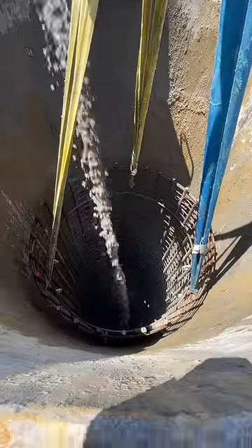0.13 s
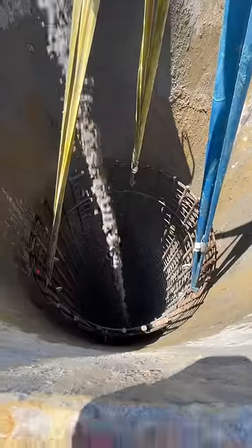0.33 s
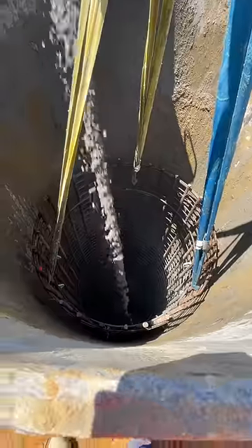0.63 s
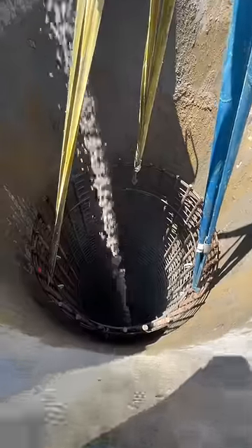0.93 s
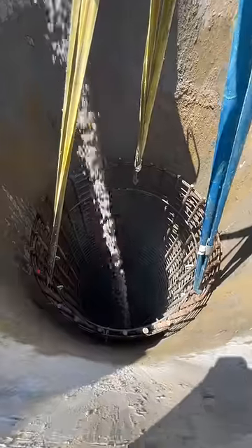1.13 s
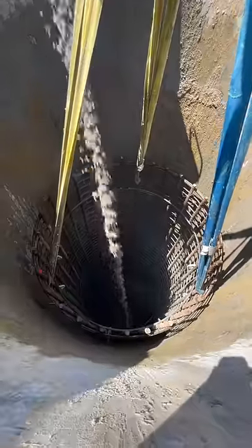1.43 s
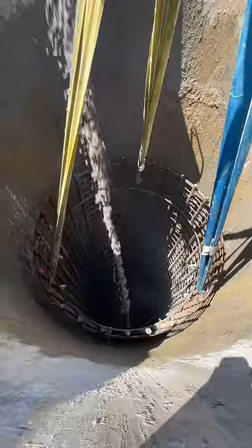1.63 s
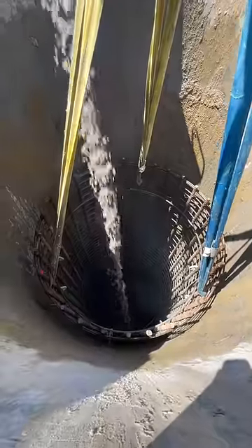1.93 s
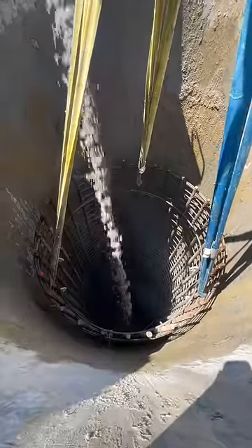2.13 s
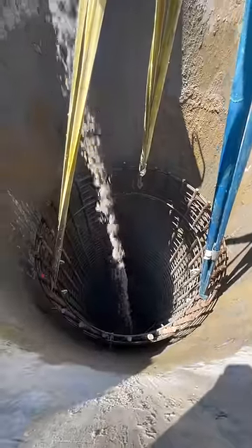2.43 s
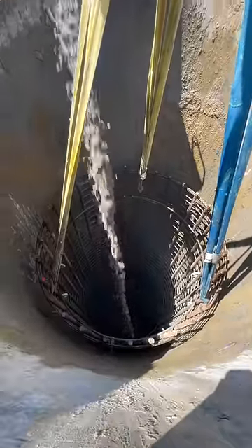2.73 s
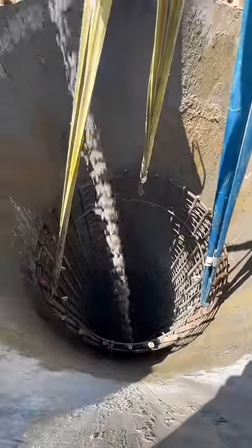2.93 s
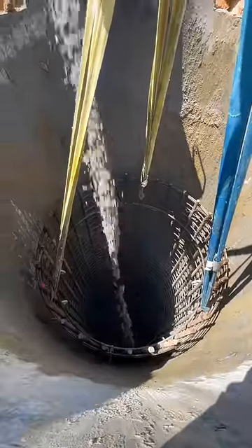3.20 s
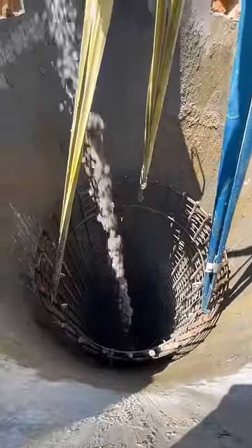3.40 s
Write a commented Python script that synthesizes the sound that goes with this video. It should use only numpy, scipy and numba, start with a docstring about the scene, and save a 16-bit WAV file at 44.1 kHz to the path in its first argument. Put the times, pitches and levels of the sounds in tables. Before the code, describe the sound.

Wet concrete pours into a deep shaft in a dense, surging, gravelly rush with wet splatter.

```python
"""Wet concrete falls from a chute into a deep drilled shaft with a steel cage, heard from the rim.
Throughout, grains and noise make a surging gravel rush, wet splatter, wash and a low, lumpy rumble.
Air pockets pop from the first instant as short sines; from 0.2 s slugs slap as bursts of banded grains;
from 0.6 s heavy clumps thud as wavering low sines. The clearest pop comes at 2.2 s, and the thuds
crowd together after 3 s."""
import sys
import numpy as np
from scipy import signal
from scipy.fft import rfft, irfft
from scipy.io import wavfile
from numba import njit

SR = 44100
rng = np.random.default_rng(int(sys.argv[2]) if len(sys.argv) > 2 else 0)


def int16_out(signal):
    """Quantize to a 16-bit WAV file."""
    q = np.round(np.clip(np.atleast_2d(signal).T, -1, 1) * 32767)
    wavfile.write(sys.argv[1], SR, q.astype(np.int16))


N = 156996
FREQS = np.maximum(np.arange(N // 2 + 1) * SR / N, 1)  # Hz


# surges of the pour, used about their mean: time_s [s], level_db [dB]
GRAVEL_SURGE = [(0, -27.5), (.07, -29), (.14, -29), (.21, -24.5), (.29, -25), (.37, -29.5), (.48, -29.5),
                (.55, -28), (.73, -29.5), (.79, -26.5), (.89, -27), (.99, -27.5), (1.17, -26), (1.205, -29),
                (1.24, -25.5), (1.37, -26), (1.46, -28), (1.6, -25.5), (1.64, -28.5), (1.71, -26),
                (1.85, -26), (1.98, -29), (2.04, -30.2), (2.1, -27.5), (2.19, -26.5), (2.26, -25),
                (2.37, -27), (2.41, -29), (2.47, -27), (2.6, -28), (2.69, -25.5), (2.77, -27), (2.85, -28),
                (3.08, -28.5), (3.15, -25.5), (3.35, -27.5), (3.47, -31), (3.52, -28), (3.55, -24)]
# gravel spectrum: freq_hz [Hz], gain_db [dB]
GRAVEL_SPECTRUM = [(1200, -23.5), (2500, -4.5), (3400, -3), (4100, -2.3), (4850, 1.5), (6500, -0.3),
                   (7500, -6.5), (9100, -4), (10500, -8.5), (12000, -11.5), (13200, -14)]
STONES_PER_S, STONE_SPREAD_DB, STONE_CYCLES = 9000, 1, 16  # rate at mean flow; cycles to -60 dB
SPRAY_DB, GRAVEL_DB = 1, -24.5  # spray is relative to the ticks


def gravel():
    """Stones tick in a fine spray; more of them, and louder, as the flow surges."""
    flow_db = swing(GRAVEL_SURGE)
    stones_per_s = STONES_PER_S * from_db(.5 * flow_db)
    ticks = grains(stones_per_s, STONE_SPREAD_DB, STONE_CYCLES, low_hz=1905, high_hz=14700)
    spray = from_db(SPRAY_DB) * noise()
    rush = coloured(ticks + spray, GRAVEL_SPECTRUM)
    flicker_db = 0.27 * drift(7.3)
    return rush * from_db(GRAVEL_DB + 0.86 * flow_db + flicker_db)


# wet splatter level, used about its mean: time_s [s], level_db [dB]
SPLATTER_SURGE = [(0, -31), (.16, -32), (.23, -31), (.33, -32), (.42, -31.5), (.46, -31.5), (.54, -30.5),
                  (1.02, -31), (1.1, -31.5), (1.4, -31), (1.5, -31), (1.6, -29), (1.66, -32.6),
                  (1.71, -29.5), (1.94, -33.5), (2.0, -35), (2.12, -32), (2.25, -31), (2.32, -30),
                  (2.4, -33), (2.46, -31.5), (2.52, -31.8), (2.58, -31), (2.64, -31.5), (2.77, -30),
                  (2.815, -36), (2.9, -31), (3.04, -33), (3.16, -30.5), (3.3, -30.5), (3.45, -34),
                  (3.55, -29)]
# splatter spectrum: freq_hz [Hz], gain_db [dB]
SPLATTER_SPECTRUM = [(700, -32.5), (1400, -10.5), (2000, -3.5), (2400, -2), (2650, -1), (3100, -5),
                     (4000, -6.5), (7000, -50), (14000, -46)]
SPLATS_PER_S, SPLAT_SPREAD_DB, SPLAT_CYCLES = 1400, 1, 117  # cycles to -60 dB
SLURRY_DB, SPLATTER_DB = 2, -28  # slurry is relative to the pops


def splatter():
    """Wet clumps burst in short pops over running slurry, with a shifting colour."""
    pops = grains(SPLATS_PER_S, SPLAT_SPREAD_DB, SPLAT_CYCLES, low_hz=1002.6, high_hz=4988)
    slurry = from_db(SLURRY_DB) * noise()
    wet = coloured(pops + slurry, SPLATTER_SPECTRUM)
    wet = patchy(wet, depth_db=1.18, rate_hz=17, low_hz=1220, count=4)
    return wet * from_db(SPLATTER_DB + 0.93 * swing(SPLATTER_SURGE))


# slugs that slap wall and cage: start_s [s], level_db [dB], pitch_hz [Hz], width_oct [octaves]
SLAP_EVENTS = [(.21, -27, 2840, .4), (.28, -23.5, 2670, .4), (1.778, -25, 3000, 1.8),
               (2.055, -30.5, 680, 0.53), (2.155, -25, 2300, .5), (2.225, -30, 3600, 0.45),
               (2.26, -27, 4300, 1.0), (2.322, -27, 1610, .7), (2.35, -27, 3350, 0.3),
               (2.68, -28.5, 1900, 0.45), (2.765, -24, 2500, 0.77), (3.54, -24, 1900, 0.7)]
SLAP_ATTACK_S, SLAP_T60_S = 0.0036, 0.16


def slaps():
    """Each slug lands with a short spray of droplets around a pitch of its own."""
    out, time_s = np.zeros((2, N)), np.arange(N) / SR
    spray = rfft(grains(per_s=6600, spread_db=-2.0, cycles=9, low_hz=400, high_hz=9050))
    for start_s, level_db, pitch_hz, width_oct in SLAP_EVENTS:
        age_s = np.maximum(time_s - start_s, 0)
        attack = np.minimum(age_s / SLAP_ATTACK_S, 1)
        decay = from_db(-60 * np.minimum(age_s / SLAP_T60_S, 2))
        band = np.exp(-2 * (np.log2(FREQS / pitch_hz) / width_oct) ** 2)
        out += from_db(level_db) * attack * decay * rms_one(irfft(spray * band, N))
    return out


# trapped air pockets: start_s [s], level_db [dB], pitch_hz [Hz]
GLUG_EVENTS = [(.012, -23, 1076), (.028, -30, 865), (.292, -24, 990), (.816, -28, 865), (1.072, -26, 1380),
               (1.15, -26, 770), (1.234, -25, 1080), (2.162, -16.5, 2074), (2.323, -30, 500),
               (2.404, -20, 880), (2.564, -23, 1240), (2.793, -26, 516), (2.921, -30, 624),
               (2.984, -30, 800), (3.02, -28, 874)]
GLUG_ATTACK_S, GLUG_T60_S = 0.0032, 0.077


def glugs():
    """Trapped air pockets pop clearly as short, nearly steady sines."""
    return booms(GLUG_EVENTS, GLUG_ATTACK_S, GLUG_T60_S, waver=0.0042)


# heavy clumps landing far down: start_s [s], level_db [dB], pitch_hz [Hz]
THUD_EVENTS = [(.57, -29, 129), (.6, -28, 51.5), (1.295, -35, 64), (1.4, -35, 149), (1.47, -31, 60),
               (1.59, -30, 86), (1.848, -27.5, 259), (1.86, -31.5, 178), (2.972, -27, 132),
               (3.06, -32, 129), (3.218, -32, 253), (3.277, -26.5, 158), (3.29, -30, 202),
               (3.318, -27, 107), (3.435, -27, 233)]
THUD_ATTACK_S, THUD_T60_S = 0.017, 0.19


def thuds():
    """Heavy clumps land far down as low sines of unsteady pitch."""
    return booms(THUD_EVENTS, THUD_ATTACK_S, THUD_T60_S, waver=0.055)


# hollow wash level, used about its mean: time_s [s], level_db [dB]
WASH_SURGE = [(0, -34), (.08, -38.5), (.13, -38), (.18, -36.5), (.24, -38.7), (.3, -38), (.4, -36),
              (.47, -41), (.58, -38), (.72, -38), (.85, -36), (.98, -39), (1.06, -35.5), (1.19, -38),
              (1.26, -36), (1.38, -38.5), (1.45, -38.5), (1.5, -39), (1.59, -38), (1.69, -37.5),
              (1.9, -37.5), (1.97, -38), (2.25, -37), (2.37, -38.5), (2.42, -36.5), (2.5, -38.5),
              (2.63, -39), (2.7, -38), (3.02, -38), (3.09, -36), (3.15, -38), (3.45, -38), (3.55, -37.5)]
# wash spectrum: freq_hz [Hz], gain_db [dB]
WASH_SPECTRUM = [(200, -46), (400, -9), (600, -2), (800, 1), (1300, 1.5), (1800, -3), (2800, -1.5),
                 (6000, -31)]
WASH_DB = -31


def wash():
    """Duller gurgles of ringing grains, blurred by louder noise."""
    gurgles = grains(per_s=1300, spread_db=0.0, cycles=24.6, low_hz=325.3, high_hz=2365)
    blurred = coloured(gurgles + from_db(8) * noise(), WASH_SPECTRUM)
    return blurred * from_db(WASH_DB + 1.16 * swing(WASH_SURGE))


# levels of low middle, rumble and deepest bass, used about their means: time_s [s], level_db [dB]
HOLLOW_SURGE = [(0.0, -34), (0.26, -46), (0.29, -42), (0.31, -51), (0.35, -40.5), (0.48, -45), (0.51, -51),
                (0.57, -40), (0.99, -42.5), (1.9, -40), (1.98, -55), (2.07, -40), (2.09, -51), (2.13, -40),
                (2.18, -43), (2.23, -38), (2.29, -47), (2.33, -36.5), (2.39, -42), (2.44, -36), (2.51, -50),
                (2.6, -41.5), (2.92, -35), (3.4, -44), (3.48, -37), (3.56, -42)]
RUMBLE_SURGE = [(0, -48.5), (.22, -45.5), (.36, -49), (.42, -45.5), (.52, -45), (.6, -42.5), (.7, -44.5),
                (1.15, -44.5), (1.42, -43), (1.55, -44.5), (1.63, -44.5), (1.7, -45.5), (1.87, -41),
                (1.95, -43), (2.18, -45.5), (2.29, -49), (2.34, -45), (2.39, -45.5), (2.55, -44.5),
                (2.83, -42), (2.94, -46.5), (3.0, -45), (3.17, -43), (3.3, -41.5), (3.4, -43), (3.55, -45)]
DEEP_SURGE = [(0, -44), (.22, -43.5), (.29, -48), (.44, -44), (.55, -52), (.62, -42), (.8, -45),
              (.98, -50.5), (1.3, -42), (1.38, -51), (1.48, -45), (1.6, -43), (1.71, -52), (1.8, -43.5),
              (1.9, -52), (2.2, -45), (2.3, -50), (2.85, -48), (3.15, -52), (3.35, -44), (3.47, -50.5),
              (3.55, -49)]
# their spectra: freq_hz [Hz], gain_db [dB]
HOLLOW_SPECTRUM = [(140, -34), (230, 3), (350, 5.5), (510, 2), (680, -3.5), (1200, -22.5)]
RUMBLE_SPECTRUM = [(60, -31), (98, -10), (118, 2.5), (148, 2.5), (190, 1), (260, -1), (380, -6.5),
                   (600, -12.5), (1500, -24)]
DEEP_SPECTRUM = [(22, -29), (35, -13.5), (52, 7), (70, 5), (90, 6.5), (130, -17), (300, -25.5)]
HOLLOW_DB, RUMBLE_DB, DEEP_DB = -44, -40, -43.5


def rumble():
    """The falling mass shakes the air in the shaft: a hollow roar, a rumble and a deeper bass."""
    hollow = coloured(noise(), HOLLOW_SPECTRUM) * from_db(HOLLOW_DB + 0.85 * swing(HOLLOW_SURGE))
    body = coloured(noise(), RUMBLE_SPECTRUM) * from_db(RUMBLE_DB + 0.95 * swing(RUMBLE_SURGE))
    deep = coloured(noise(), DEEP_SPECTRUM) * from_db(DEEP_DB + 0.86 * swing(DEEP_SURGE))
    return hollow + body + deep


# resonances of shaft and steel cage: freq_hz [Hz], width_hz [Hz], gain_db [dB]
SHAFT_RESONANCES = [(113, 13, 4), (213, 17, 0), (226, 12, -2.5), (1458, 69, 0.5), (2030, 46, -1.5),
                    (2620, 33, 0.2), (4830, 75, 0)]
WALL_ECHO_S, WALL_ECHO_DB, WALL_DULL_HZ = .0081, -18, 1850  # echo is 6 dB duller at WALL_DULL_HZ


def wall_echo(pair):
    """One dull echo across the shaft and a few mild resonances make the rush hollow."""
    delay = np.exp(-2j * np.pi * FREQS * WALL_ECHO_S)
    echo = from_db(WALL_ECHO_DB) * delay / (1 + (FREQS / WALL_DULL_HZ) ** 2)
    ring_db = sum(gain_db / (1 + (2 * (FREQS - freq_hz) / width_hz) ** 2)
                  for freq_hz, width_hz, gain_db in SHAFT_RESONANCES)
    return irfft(rfft(pair) * (1 + echo) * from_db(ring_db), N)


# likeness of the microphones: freq_hz [Hz], coherence [0-1]
MIC_COHERENCE = [(60, .66), (150, .8), (260, .94), (390, .88), (600, .33), (730, .34), (850, .12),
                 (1150, .73), (1600, .72), (2100, .33), (2650, .6), (3100, .42), (3500, .46), (3900, .2),
                 (4400, .42), (5600, .62), (6600, .64), (7200, .97), (7900, .97), (8500, .68), (12500, .65),
                 (13300, .8)]
# phase by which left leads: freq_hz [Hz], lead_rad [radians]
MIC_LEAD = [(100, -.15), (270, .15), (500, 1.5), (780, 1.2), (920, -1.4), (1300, -1.3), (1850, -.8),
            (2250, -2.3), (3100, -2.4), (3700, -3.1), (4100, -5.0), (4500, -4.25), (5000, -5.4),
            (5500, -5.2), (6600, -4.1), (7100, -3.2), (7900, -3.05), (8400, -2.3), (9600, -1.6),
            (10500, -.1), (12000, .1), (13400, 3.1)]
# left minus right: freq_hz [Hz], tilt_db [dB]
MIC_TILT = [(60, -0.5), (130, -1.2), (320, -4.5), (430, 0.5), (600, 6), (870, 12.5), (1050, 8.5), (1300, 5),
            (1800, 0.8), (2700, 1.4), (4700, -0.8), (12000, -0.3)]


def microphones(pair):
    """Two streams become left and right, partly alike, with lead and level difference by frequency."""
    a, b = rfft(pair)
    alike, tilt = np.clip(by_hz(MIC_COHERENCE), 0, 1), from_db(by_hz(MIC_TILT))
    common, apart = np.sqrt(1 + alike) * a, np.sqrt(1 - alike) * b
    left = (common + apart) * tilt
    right = (common - apart) * np.exp(-1j * by_hz(MIC_LEAD))
    return irfft(np.array([left, right]) / np.sqrt(1 + tilt ** 2), N)


GRAIN_RISE = 0.16  # rise time / decay time


def grains(per_s, spread_db, cycles, low_hz, high_hz):
    """Two streams of random impacts, each ringing for some cycles at a pitch of its own."""
    out = []
    top_hz = min(high_hz, SR * .45)
    for chance, size, pitch, sign in rng.random((2, 4, N)):
        born = np.flatnonzero(chance < per_s / SR)
        hz = low_hz * (top_hz / low_hz) ** pitch[born]
        size_db = spread_db * np.minimum(-np.log1p(-size[born]), 5)
        sizes = from_db(size_db) * np.sign(sign[born] - .5) * hz
        radians = 2 * np.pi * hz / SR
        decays = np.log(1000) * hz / (cycles * SR)  # per sample
        out.append(ring_grains(born, sizes, radians, decays, GRAIN_RISE, np.zeros(N)))
    return rms_one(np.array(out))


@njit
def ring_grains(starts, sizes, radians, decays, rise, silence):
    """Sum of short sines that swell and die away, each a two-pole recursion."""
    out = silence.copy()
    for k in range(len(starts)):
        fall, swell = np.exp(-decays[k]), np.exp(-decays[k] / rise)
        turn = 2 * fall * np.cos(radians[k])
        now, before, onset = sizes[k] * np.sin(radians[k]), 0.0, 1.0
        for i in range(starts[k], min(starts[k] + int(5 / decays[k]), len(out))):
            out[i] += now * (1 - onset)
            now, before, onset = turn * now - fall * fall * before, now, onset * swell
    return out


def booms(rows, attack_s, t60_s, waver):
    """Each event swells and rings down on a wavering pitch; waver is a fraction of the pitch."""
    out, age_s = np.zeros(N + SR), np.arange(SR // 2) / SR
    envelope = np.minimum(age_s / attack_s, 1) * from_db(-60 * age_s / t60_s)
    for start_s, level_db, pitch_hz in rows:
        start = max(int(start_s * SR), 0)
        wavering_hz = pitch_hz * (1 + waver * drift(33)[:len(age_s)])
        cycles = np.cumsum(wavering_hz) / SR + rng.random()
        out[start:start + len(age_s)] += from_db(level_db) * envelope * np.sin(2 * np.pi * cycles)
    return out[:N]


def patchy(pair, depth_db, rate_hz, low_hz, count):
    """Neighbouring half-octave bands swell and sink independently, so the colour keeps shifting."""
    out, spectrum = pair.copy(), rfft(pair)
    for k in range(count):
        band = np.maximum(1 - np.abs(2 * np.log2(FREQS / low_hz) - k), 0)
        out += irfft(spectrum * band, N) * (from_db(depth_db * drift(rate_hz)) - 1)
    return rms_one(out)


def coloured(x, colour):
    """Give a sound a broad colour; unit rms."""
    return rms_one(irfft(rfft(x) * from_db(by_hz(colour)), N))


def noise():
    """Two unrelated white noises."""
    return rng.standard_normal((2, N))


def drift(rate_hz):
    """Slow random wander with spread 1: two-pole filtered noise, one value per 40 samples, interpolated."""
    r = np.exp(-80 * np.pi * rate_hz / SR)
    white = rng.standard_normal(N // 40 + 2002)
    slow = signal.lfilter([1], [1, -2 * r, r * r], white)[2000:]  # drop the filter's settling
    return np.interp(np.arange(N) / 40, np.arange(len(slow)), rms_one(slow))


def swing(rows):
    """A level curve at every sample, in dB about its mean."""
    time_s, level_db = np.transpose(rows)
    curve_db = np.interp(np.arange(N) / SR, time_s, level_db)
    return curve_db - curve_db.mean()


def by_hz(points):
    """A table read on a log-frequency axis."""
    hz, value = np.transpose(points)
    return np.interp(np.log(FREQS), np.log(hz), value)


def from_db(db):
    """Decibels to gain."""
    return 10 ** (np.asarray(db) / 20)


def rms_one(x):
    """Scale to unit rms."""
    return x / np.sqrt(np.mean(x ** 2) + 1e-20)


def scene():
    """The whole pour, heard from the rim; the thuds reach both sides alike."""
    pour = wall_echo(gravel() + splatter() + slaps() + wash() + rumble())
    glug_pair = np.outer([1, 0], glugs())  # in the common stream only
    return microphones(pour + glug_pair) + thuds()


CUTOFF_HZ = 13300


def record(dry):
    """The top is cut steeply by an elliptic low-pass."""
    low_pass = signal.ellip(10, .2, 80, CUTOFF_HZ, fs=SR, output="sos")  # order, ripple dB, stop dB
    return signal.sosfilt(low_pass, dry)


dry = scene()
out = record(dry)
int16_out(out)
```